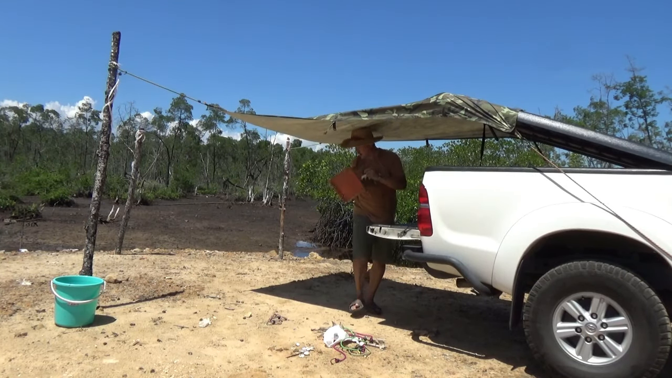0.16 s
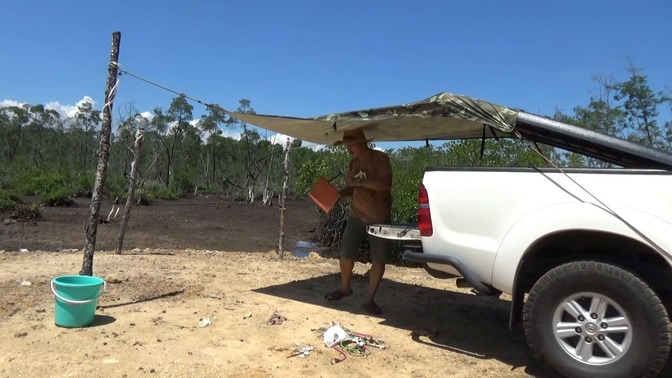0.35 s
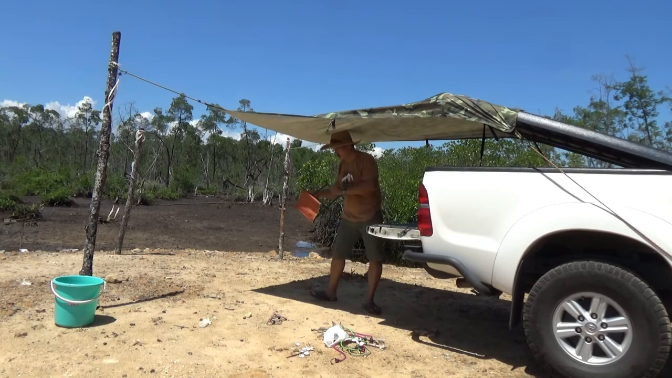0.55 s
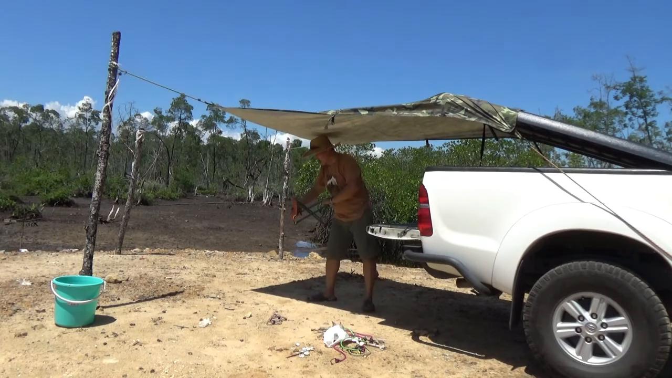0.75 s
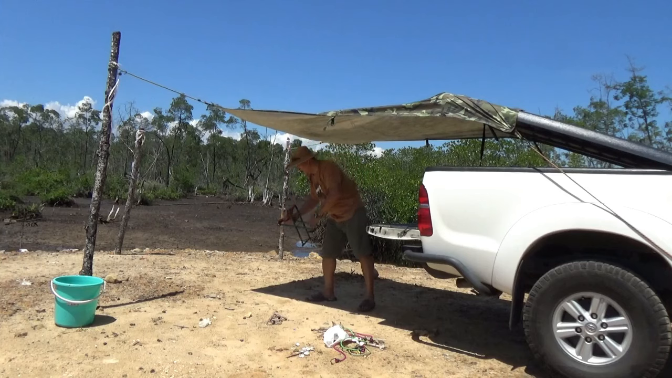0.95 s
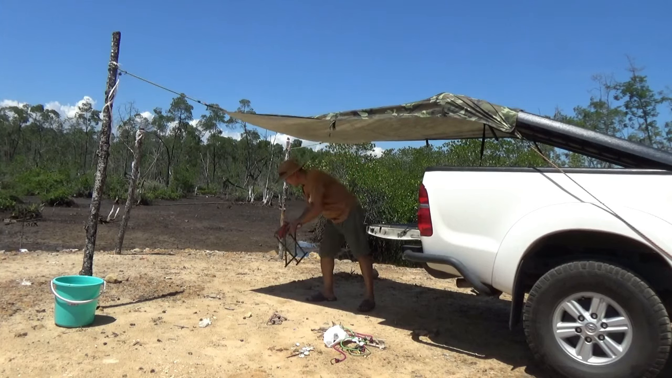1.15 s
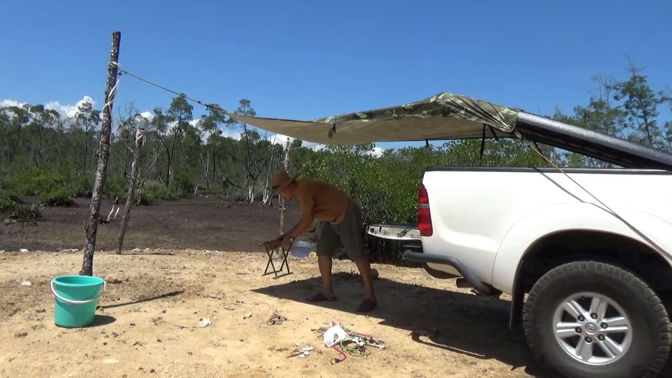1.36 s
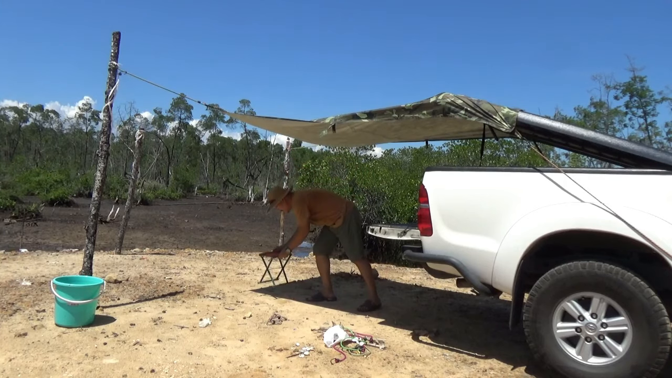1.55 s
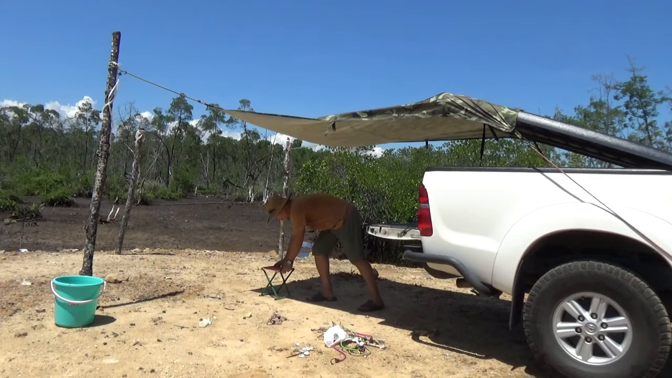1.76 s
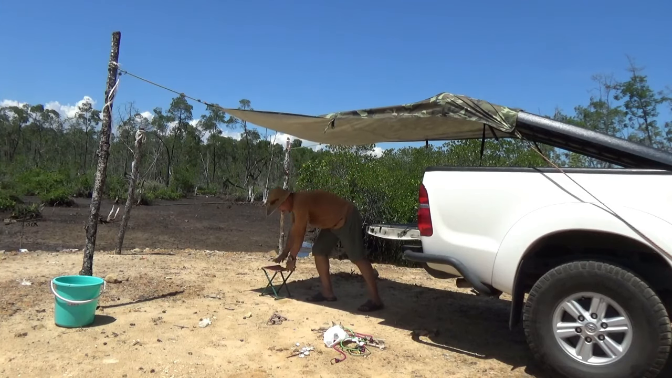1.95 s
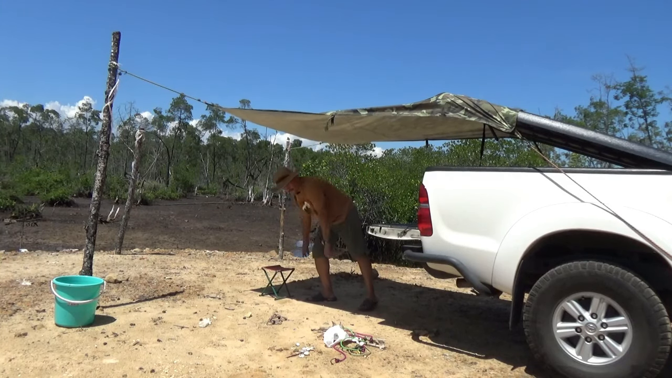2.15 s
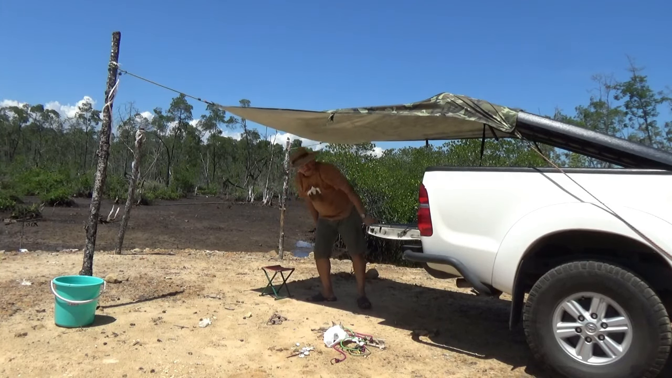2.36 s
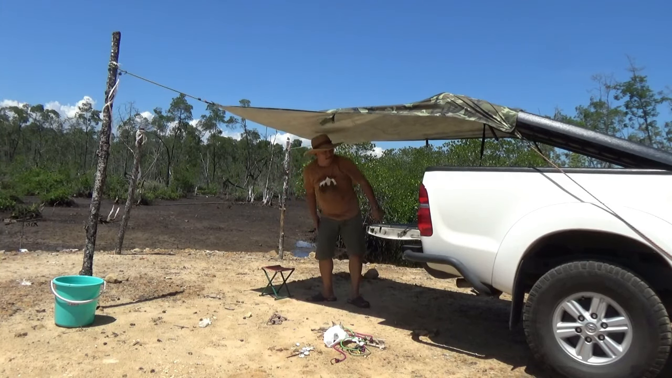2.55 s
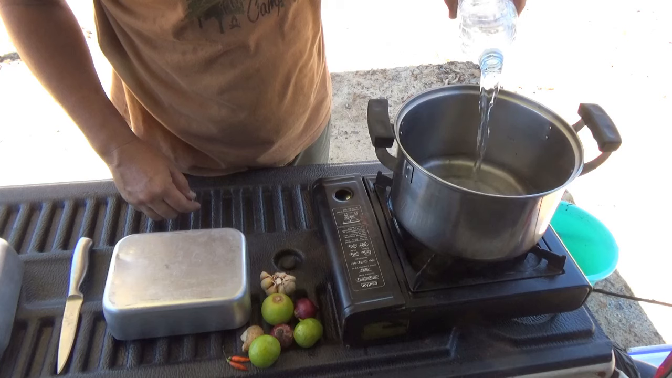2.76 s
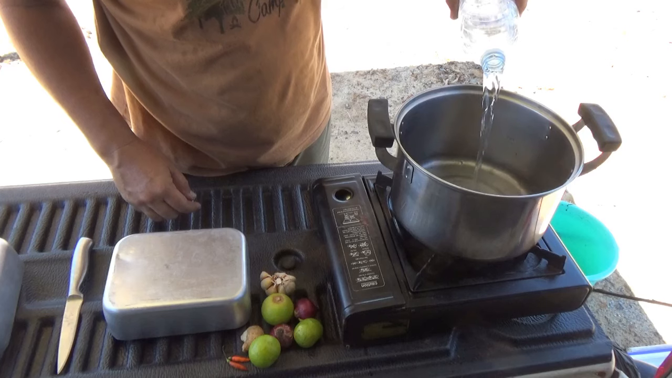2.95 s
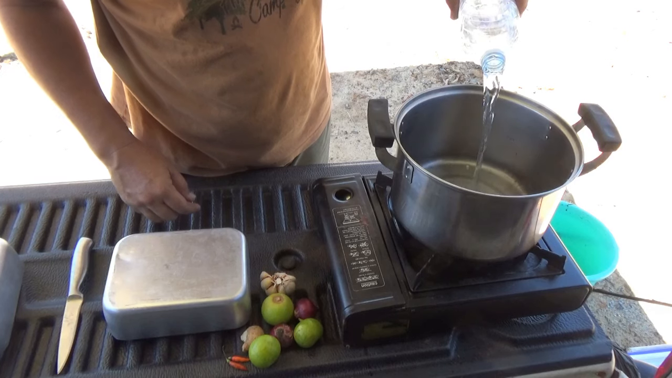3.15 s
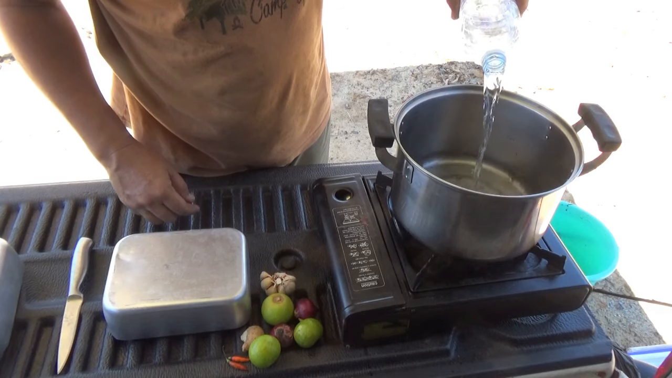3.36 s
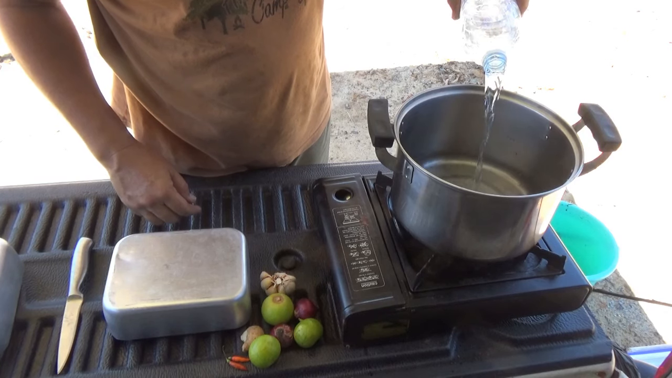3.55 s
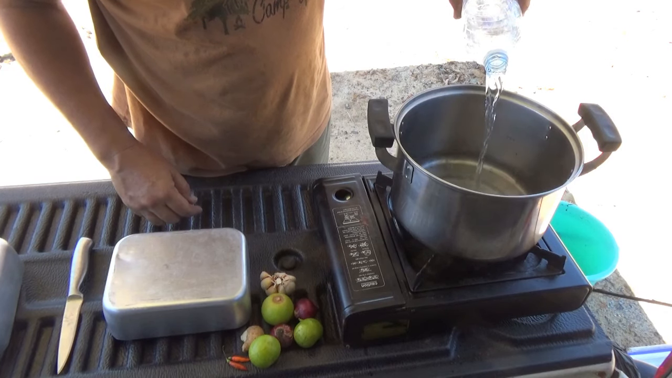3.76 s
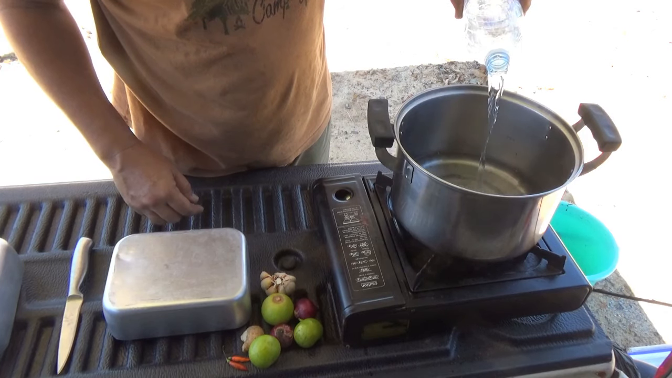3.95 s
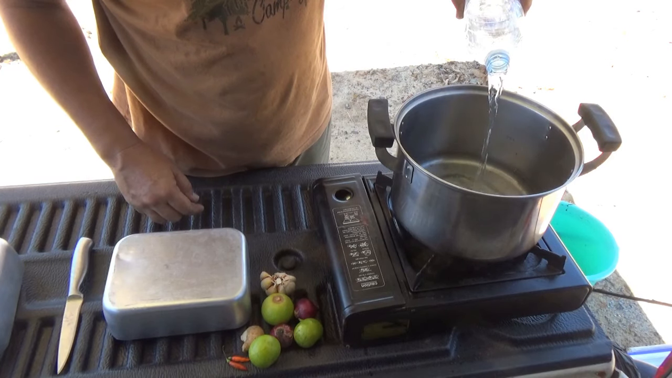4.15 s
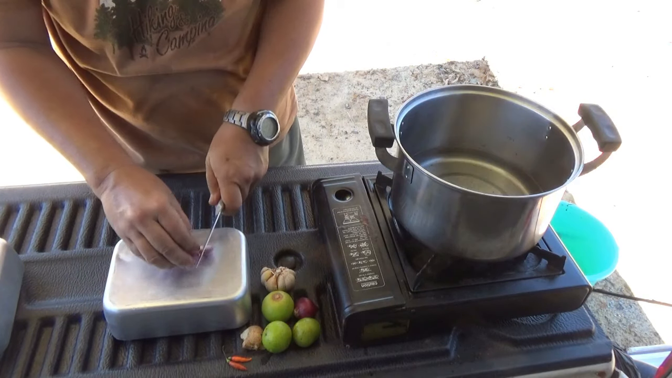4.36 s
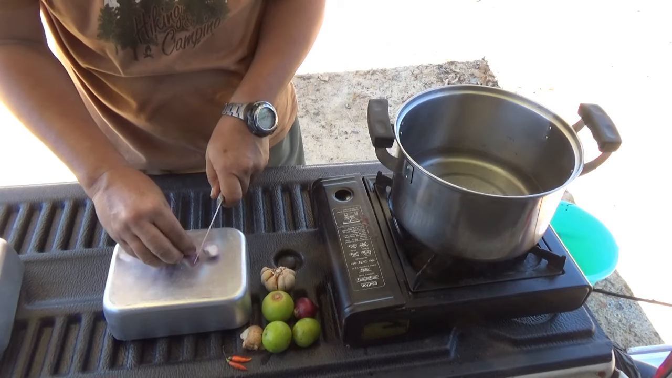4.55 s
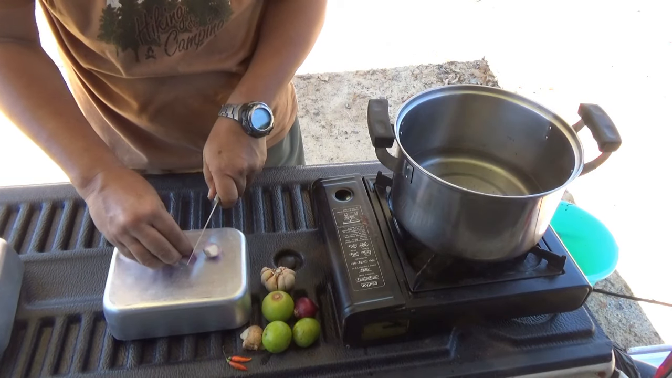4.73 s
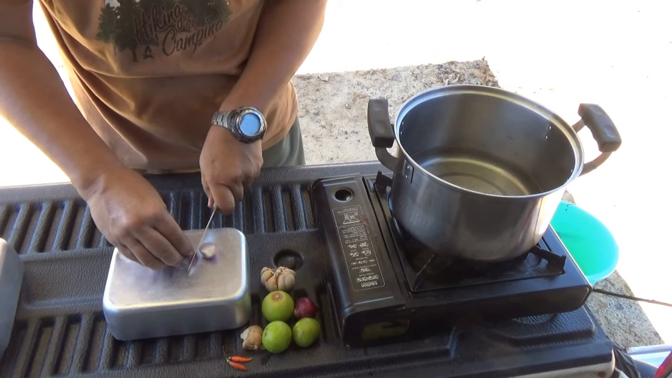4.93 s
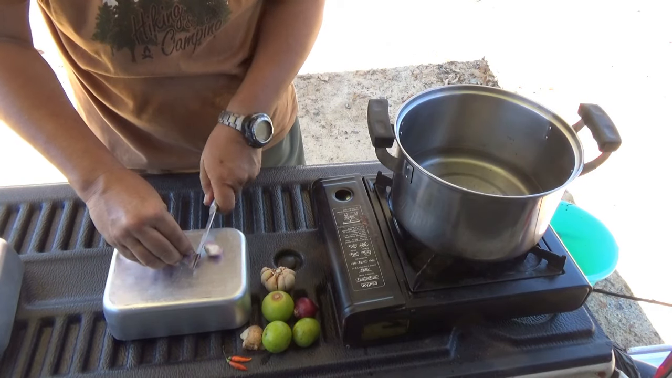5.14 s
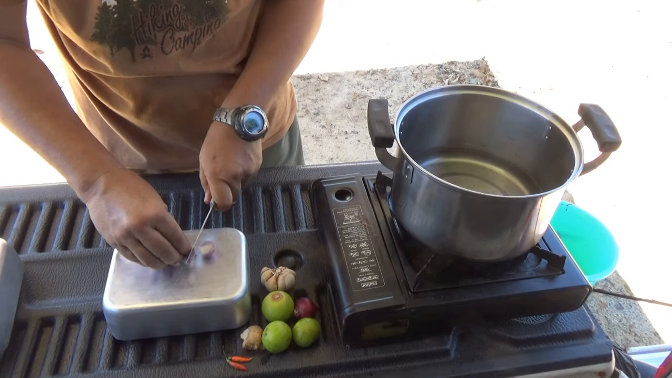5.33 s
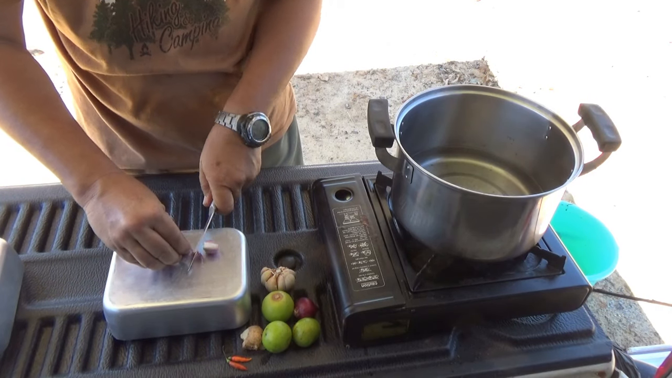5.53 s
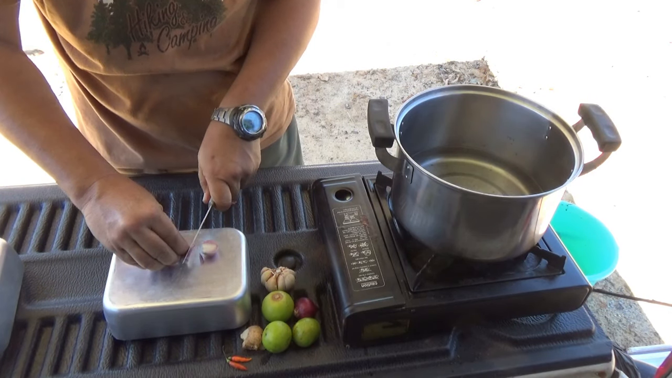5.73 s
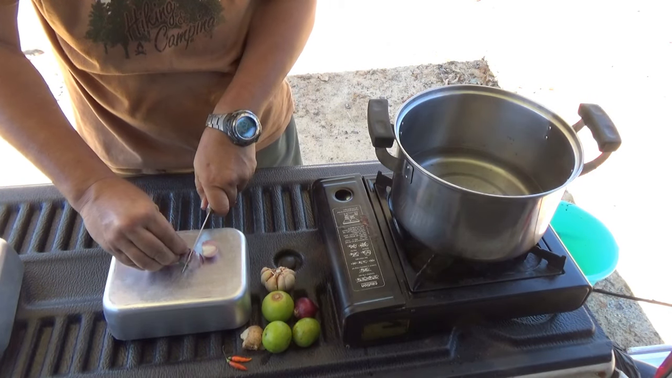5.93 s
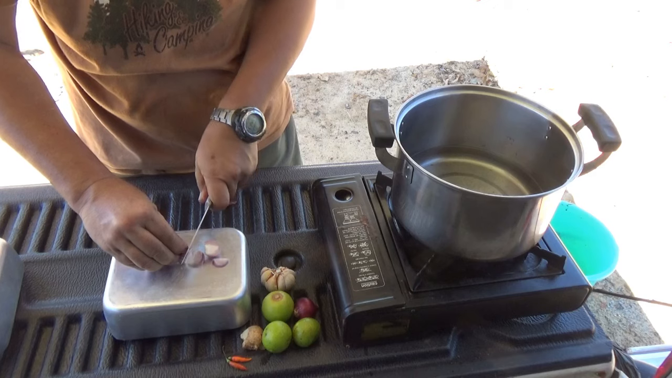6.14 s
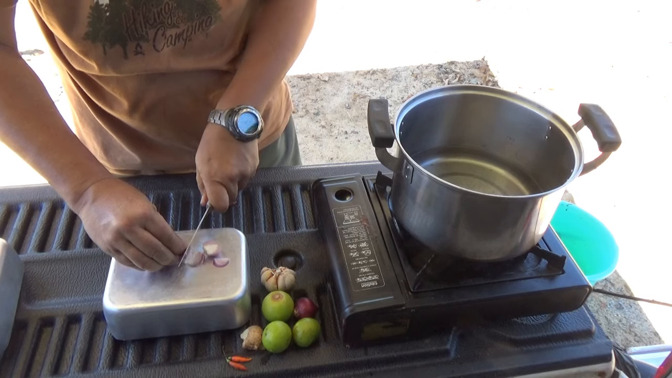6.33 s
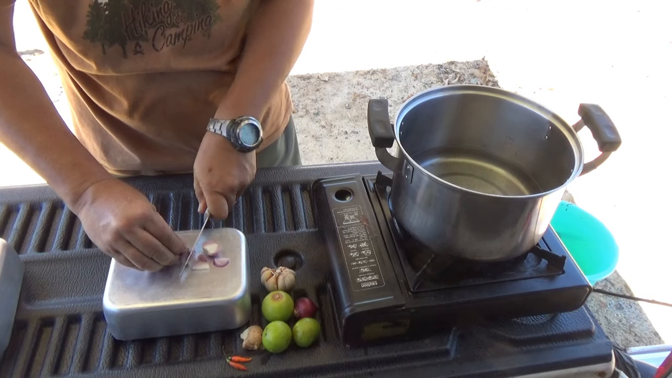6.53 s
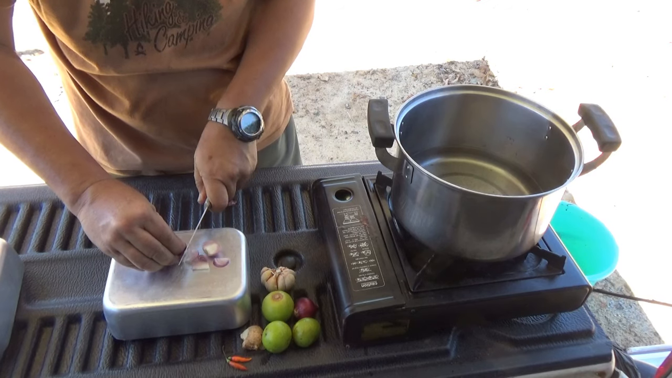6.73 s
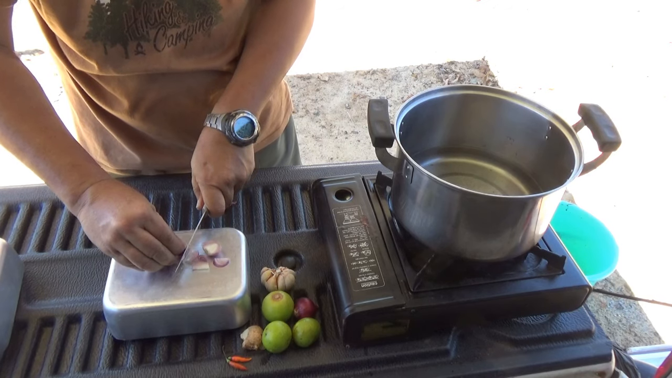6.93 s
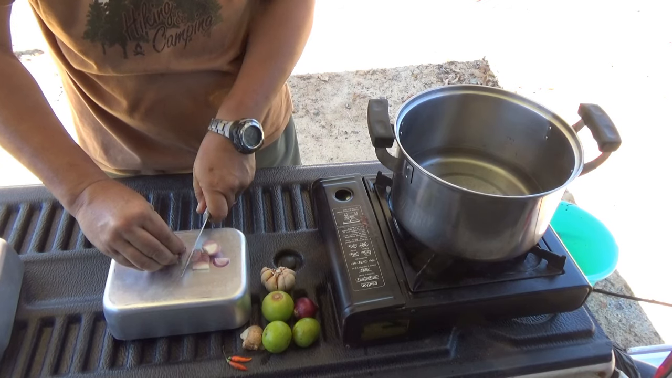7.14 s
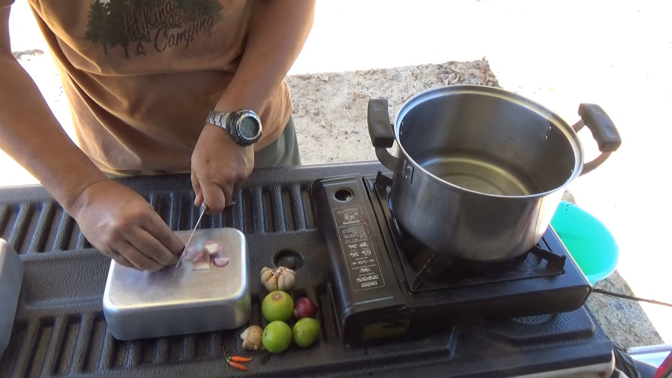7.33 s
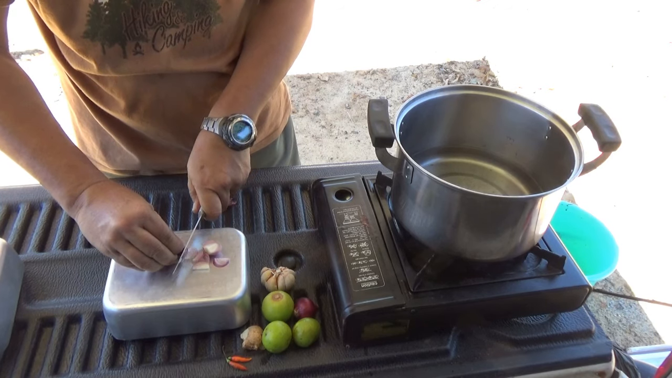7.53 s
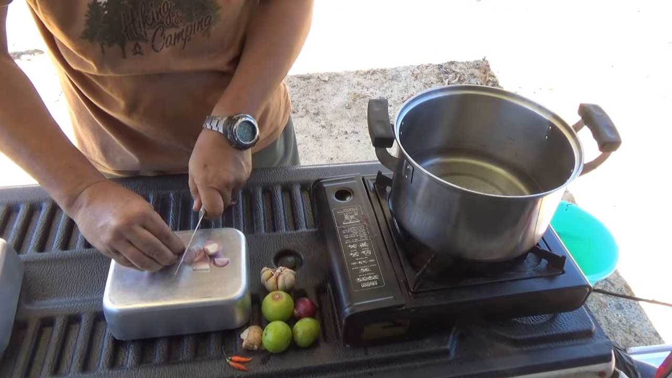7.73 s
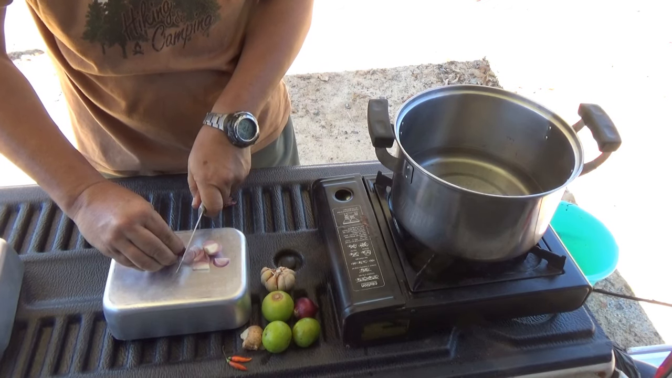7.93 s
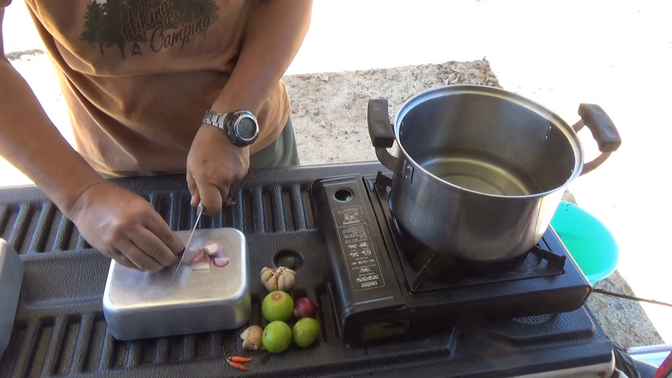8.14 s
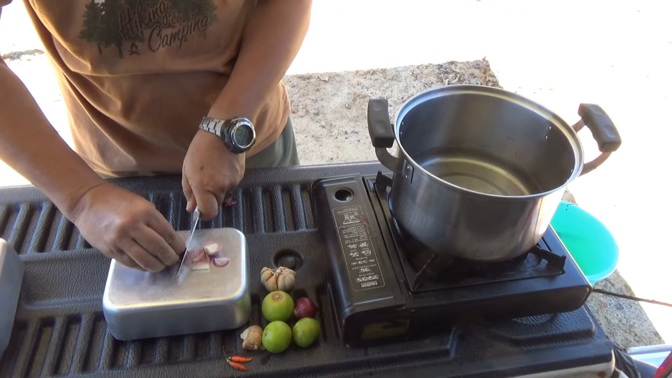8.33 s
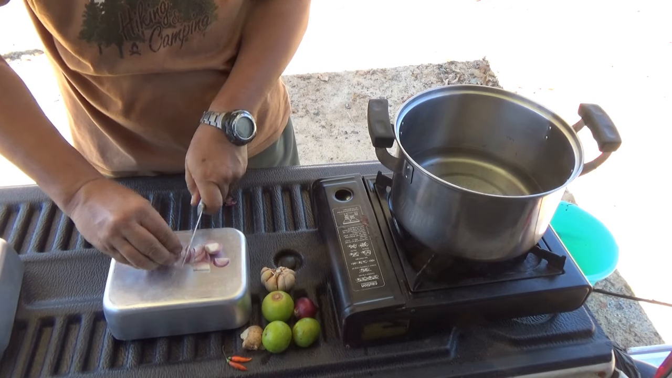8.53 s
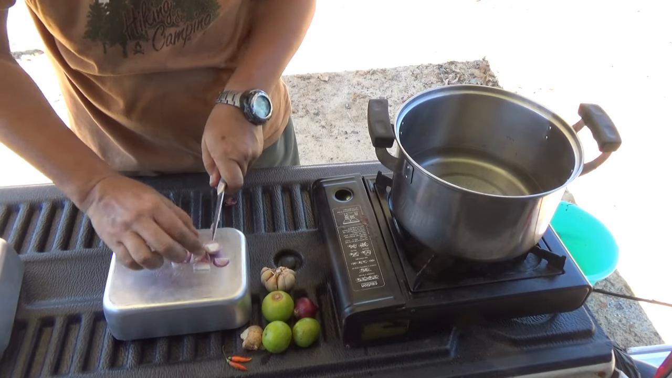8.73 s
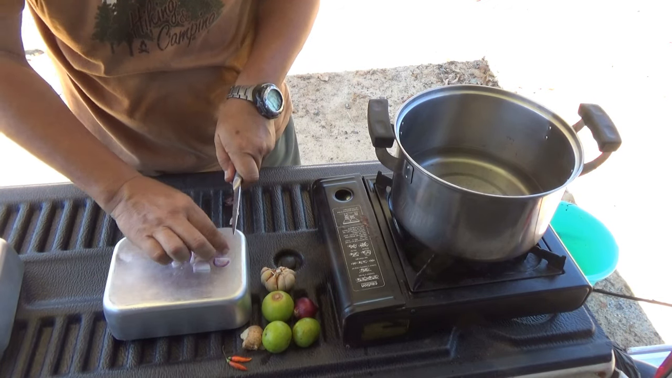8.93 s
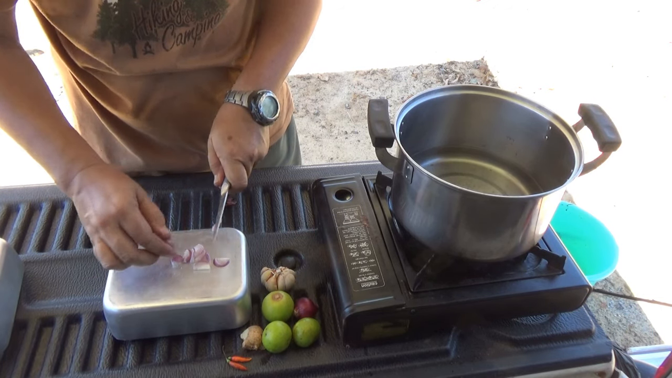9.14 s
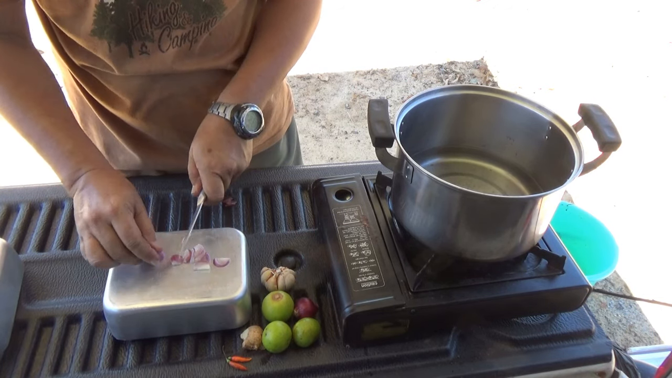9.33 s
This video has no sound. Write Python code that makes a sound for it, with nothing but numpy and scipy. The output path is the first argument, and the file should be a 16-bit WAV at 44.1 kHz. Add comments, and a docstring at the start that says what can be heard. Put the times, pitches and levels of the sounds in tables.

```python
"""In a dry bush camp, cicadas (noise swelling in step) throb over light wind, a stool's struck tubes snap and
feet crunch gravel. Then a bottle pours into a steel pot: surging fizz, bubbles rising in pitch, faintly ringing
walls. A knife saws and chops small bulbs on an upturned tin on a tailgate: rough forces drive the tin's
resonances, the panel booms and the freed blade rings in beating partials. Light tip contacts tick; late on, a
few faint bird notes glide as arched sine tones."""
import sys
import numpy as np
from scipy import signal
from scipy.io import wavfile
from scipy.ndimage import uniform_filter1d

SR = 44100
rng = np.random.default_rng(int(sys.argv[2]) if len(sys.argv) > 2 else 0)


def bounce(signal):
    """Save signal as a 16-bit WAV file at the path given by the first command-line argument."""
    frames = np.transpose(np.atleast_2d(signal))
    limited = np.clip(frames, -1, 1)
    pcm = np.round(limited * 32767).astype(np.int16)
    wavfile.write(sys.argv[1], SR, pcm)


N = 414099
T = np.arange(N) / SR


def gain_of(db):
    """Decibel law: amplitude gain is 10 to the power dB/20."""
    return 10 ** (np.asarray(db) / 20)


def evened(x):
    """Power normalization: scales the whole array to rms 1."""
    return x / np.sqrt(np.mean(x ** 2) + 1e-20)


def read(points, hz):
    """Spectral interpolation: reads a table along a logarithmic frequency axis."""
    f, value = np.transpose(points)
    return np.interp(np.log(hz + 1), np.log(f + 1), value)


def curve(rows, column=1, off=-120):
    """Envelope interpolation: one column of a time table, at the off level outside it."""
    rows = np.array(rows)
    return np.interp(T, rows[:, 0], rows[:, column], left=off, right=off)


def add(mix, s, sound):
    """Superposition: adds a sound in place, starting at s seconds."""
    part = mix[round(s * SR):][:len(sound)]
    part += sound[:len(part)]


# Coherence of far sound between the two ears: (frequency [Hz], left-right likeness [0-1])
FAR_LIKENESS = [(60, 0.99), (290, 0.85), (640, 0.22), (3100, .75), (6800, 0.59), (15000, 1)]


def noise(spectrum, patchy_db, same=FAR_LIKENESS, size=512):
    """Partial coherence: shaped stereo noise of rms 1 with drifting louder and softer patches."""
    frames, hz = 4 * N // size + 5, np.fft.rfftfreq(size, 1 / SR)
    a, b, c, d, patches = rng.standard_normal((frames, len(hz), 5)).T
    patches = uniform_filter1d(patches, size=9, axis=0)
    patches = evened(uniform_filter1d(patches, size=6, axis=1))
    like = np.clip(read(same, hz), -1, 1)[:, None]
    left, other = a + 1j * b, c + 1j * d
    z = np.array([left, like * left + np.sqrt(1 - like ** 2) * other])
    z *= gain_of(read(spectrum, hz)[:, None] + patchy_db * patches)
    return evened(signal.istft(z, nperseg=size, noverlap=3 * size // 4)[1][:, :N])


def ring(x, modes):
    """Modal resonance: two-pole filters; steady white noise of rms 1 comes out near rms 1."""
    out, power = np.zeros(len(x)), 0
    for k, (hz, width, db) in enumerate(modes):
        r = np.exp(-np.pi * width / SR)  # pole radius: a wider mode decays sooner
        poles = [1, -2 * r * np.cos(2 * np.pi * hz / SR), r * r]
        mode = np.sqrt(1 - r) * signal.lfilter([1, 0, -1], poles, x)
        out += (-1) ** k * gain_of(db) * mode
        power += gain_of(2 * db)
    return out / np.sqrt(power)


def strikes(s, db, t60, rise=0.00038, bend=1.025):
    """Impact decay: envelopes that rise fast and die away, each cut off at 0.25 s."""
    out, t = np.zeros(N), np.arange(SR // 4) / SR
    for when, level_db, fall in zip(s, db, t60):
        decay = gain_of(level_db - 60 * (t / max(fall, .005)) ** bend)
        add(out, when, decay * (1 - np.exp(-t / rise)))
    return out


def swells(s, length, db, taper=0.71):
    """Gradual onset: an envelope of soft-edged bursts."""
    out = np.zeros(N)
    for when, span, level_db in zip(s, length, db):
        add(out, when, gain_of(level_db) * signal.windows.tukey(round(span * SR), min(taper, 1)))
    return out


def beat(hz, t):
    """Beating: a close pair of partials makes the ring waver."""
    apart_hz, turn = rng.uniform([15, 0], [45, 1])
    return np.sin(2 * np.pi * hz * t) + 0.33 * np.sin(2 * np.pi * ((hz + apart_hz) * t + turn))


def gritty(spread_db, span):
    """Friction roughness: random gain of rms 1, smoothed over span samples."""
    return evened(gain_of(spread_db * evened(uniform_filter1d(rng.standard_normal(N), span))))


def nearby(x, wet_db, t60, pan_db):
    """Early reflection: direct sound plus sparse echoes off ground and vehicle, unlike in each ear."""
    at = np.arange(40, 6000, 24) + rng.integers(0, 24, (2, 249))
    echoes = rng.choice([-1., 1.], at.shape) * gain_of(-60 * at / SR / t60)
    taps = np.zeros((2, 6100))
    np.put_along_axis(taps, at, echoes, 1)
    taps *= gain_of(wet_db) / np.linalg.norm(taps[0])
    taps[:, 0] = 1  # direct sound
    return signal.oaconvolve(x[None], taps, axes=1)[:, :N] * gain_of([[pan_db / 2], [-pan_db / 2]])


# Spectrum of the cicada chorus: (frequency [Hz], relative density [dB per Hz])
CICADA_SPECTRUM = [(3800, -56), (4700, -11), (5300, -4.5), (5950, 3), (6600, -4.5), (7600, -12),
                   (11500, -17), (13500, -39)]
# Spectrum of far bush and leaves: (frequency [Hz], relative density [dB per Hz])
AIR_SPECTRUM = [(30, -27), (60, -3), (130, -3), (300, -7.5), (700, -12.5), (2000, -16), (4000, -19),
                (9000, -16.5), (16000, -36)]
# Spectrum of wind on the microphone: (frequency [Hz], relative density [dB per Hz])
GUST_SPECTRUM = [(25, -7), (70, 7), (150, -7), (240, -16.5), (480, -56)]
# Separate gusts, dying down: (time [s], level [dB])
GUST_LEVELS = [(0, -43.5), (.2, -33), (.26, -49.5), (.39, -42), (.66, -78), (.77, -56), (.93, -70),
               (1., -46), (1.07, -76), (1.13, -54.5), (1.5, -72), (1.6, -59), (2.3, -69)]
STEP_S = 2.664  # the chorus and air grow louder and the throb gaps deepen: the levels below step from first to second
CHORUS_DB, AIR_DB, GAP_DEPTH_DB = (-51, -44), (-55.5, -51.5), (2, 7.5)
# throb rate [1/s] at GAP_S [s], where a gap falls, and its steady slowing [1/s^2]
THROBS_PER_S, GAP_S, SLOWING_PER_S2 = 6.49, 7.397, .09


def bush():
    """Amplitude modulation throbs the cicadas over steady air; turbulence buffets the microphone."""
    levels = (CHORUS_DB, GAP_DEPTH_DB, AIR_DB)
    chorus_db, depth_db, air_db = (np.where(T < STEP_S, *pair) for pair in levels)
    since = T - GAP_S
    cycles = (THROBS_PER_S - SLOWING_PER_S2 * since / 2) * since
    gaps = abs(np.cos(np.pi * cycles)) ** 2.6  # long swells, short gaps
    cicadas = noise(CICADA_SPECTRUM, patchy_db=1.4) * gain_of(chorus_db - depth_db * gaps)
    air = noise(AIR_SPECTRUM, patchy_db=2.1, size=1024) * gain_of(air_db)
    gusts = noise(GUST_SPECTRUM, patchy_db=2.5, size=2048) * gain_of(curve(GUST_LEVELS))
    return cicadas + air + gusts


# Stool snaps: (time [s], level [dB])
SNAPS = [(0.172, -11.5), (0.223, -34), (1.105, -31), (1.25, -30.5), (1.7156, -17.5)]
# Modes of the frame tubes: (frequency [Hz], width [Hz], relative level [dB])
TUBE_MODES = [(674, 60, -11), (1980, 160, 12), (3960, 240, 7.5), (6660, 550, 16.5), (8080, 1400, 16.5),
              (10300, 960, 9.5)]
# Spectrum of crunching gravel: (frequency [Hz], relative density [dB per Hz])
GRAVEL_SPECTRUM = [(400, 1), (1500, 9), (4500, 8), (9900, 4.5), (16000, -15)]
# Feet and cloth: (start [s], length [s], level [dB])
SHUFFLES = [(0, 0.66, -51.5), (0.616, 0.27, -50), (0.796, 0.17, -47.5), (1.066, 0.12, -55),
            (1.598, 0.13, -51.5), (2.027, 0.093, -53.5), (2.492, 0.11, -53)]


def stool():
    """Impact excitation rings the frame tubes and a low thud; granular friction crunches gravel."""
    s, db = np.transpose(SNAPS)
    white = rng.standard_normal(N)
    burst = strikes(s, db, 0.041 + 0 * s, rise=0.0013) * white
    clatter = signal.lfilter([1, 2, 1], 4, burst)  # broadband, with softened treble
    snap = gain_of(-3.0) * ring(burst, TUBE_MODES) + gain_of(-4.0) * clatter
    thud = ring(strikes(s, db - 21.5, 0.12 + 0 * s) * white, [(130, 76, 4.9), (292, 310, 7)])
    grains = noise(GRAVEL_SPECTRUM, patchy_db=2.0, size=256) * gritty(spread_db=0.5, span=60)
    crunch = grains * swells(*np.transpose(SHUFFLES))
    return nearby(snap + thud, wet_db=-8.5, t60=0.1, pan_db=0.5) + crunch


# Flow of the stream, which thins twice as the bottle gulps air: (time [s], splash level [dB])
STREAM_FLOW = [(2.664, -42.5), (3.25, -39.5), (3.38, -45), (3.5, -41), (3.78, -37), (3.81, -48.5),
               (3.87, -47.5), (3.9, -40), (4.245, -39)]
# Spectrum of the splash: (frequency [Hz], relative density [dB per Hz])
SPLASH_SPECTRUM = [(600, -16.5), (1700, -4.5), (3200, -12), (5000, -1.5), (8000, -1.5), (10100, -9.5),
                   (16000, -34)]
# Modes of the steel pot: (frequency [Hz], width [Hz], relative level [dB])
POT_MODES = [(636, 12, -1.5), (1144, 14, -5), (1714, 36, -9), (1960, 23, -11), (2940, 29, -3),
             (3635, 72, 3.5), (4800, 110, -6)]
# Loud bubbles: (time [s], level [dB], starting pitch [Hz])
BUBBLES = [(2.6656, -19, 6500), (2.761, -39, 8200), (2.794, -34.5, 3520), (2.89, -25.5, 9200),
           (2.9671, -30.5, 7800), (3.14, -22.5, 5100), (3.196, -25.5, 6800), (3.236, -28, 7800),
           (3.4005, -25, 4530), (3.416, -32, 3700), (3.481, -27, 8500), (3.616, -24.5, 7000),
           (3.7065, -47, 7140), (3.7628, -29, 6830), (3.9624, -34, 4400), (4.1478, -30, 5000),
           (4.157, -27, 10100), (4.2033, -38, 3630), (4.2353, -27, 5750)]
# the slug of water that traps a loud bubble also swells the splash, by a level relative to the bubble
SURGE_DB, SURGE_T60_S = -17, 0.14


def water():
    """Bubble resonance: a surging stream fizzes, traps bubbles that rise in pitch and drums the steel."""
    s, db, _ = np.transpose(BUBBLES)
    surges = strikes(s, db + SURGE_DB, SURGE_T60_S + 0 * s) * (T < STREAM_FLOW[-1][0])
    level = gain_of(curve(STREAM_FLOW)) + surges
    fizz = noise(SPLASH_SPECTRUM, patchy_db=4.0, same=[(1, 1), (9, 0.91)], size=256)[0]
    fizz = fizz * gritty(spread_db=2.0, span=25)
    steel = ring(noise([(1, 0), (9, 0)], patchy_db=6.0, size=2048)[0], POT_MODES)
    small, t = np.zeros(N), np.arange(SR // 20) / SR
    for hz in np.geomspace(1600, 10500, num=20):  # 25 small bubbles a second at each pitch
        sizes = gain_of(3.9 * np.minimum(rng.exponential(1, N), 4))
        drops = (rng.random(N) < 25. / SR) * sizes
        chirp = np.exp(-t * hz / 15) * np.sin(2 * np.pi * hz * t * (1 + 5.6 * t))
        small += signal.oaconvolve(drops, chirp)[:N]
    # the steel rings faintly under the fizz and small bubbles
    out = level * (gain_of(-2.5) * fizz + gain_of(-12) * steel + gain_of(-9) * evened(small))
    for s, db, hz in BUBBLES:  # a clear bubble inside a spray of smaller ones near its pitch
        tone = gain_of(-60 * t * hz / 170) * np.sin(2 * np.pi * hz * t * (1 + 0.56 * t))
        spray = ring(rng.standard_normal(len(t)), [(hz, 900., 0)])
        spray = gain_of(-12.0 - 60 * t / 0.094) * spray
        add(out, s, gain_of(db) * (1 - np.exp(-t / 0.0021)) * (tone + spray))
    return nearby(out, wet_db=-7.5, t60=0.085, pan_db=-1.0)


# Strokes drag harder and harder, cut through onto the tin, spring free and ring: (start [s], cut [s],
# scrape level at the cut [dB], then ring level of each of four blade modes [dB], as the grip damps it)
STROKES = [(4.952, 4.96, -23, -38, -31, -26.5, -29), (5.43, 5.43, -15, -28, -35, -26, -23.5),
           (5.877, 5.921, -19, -30, -38, -35, -26), (6.289, 6.462, -18.5, -51, -29.5, -37, -44),
           (6.839, 7.03, -16, -47, -38, -36, -25), (7.497, 7.607, -17.5, -23.5, -38, -40, -22.5),
           (8.378, 8.386, -17, -35, -29, -37, -45)]
FREE_S = 0.023  # from the cut to the peak of the drag, where the blade springs free
DRAG_DB, DRAG_RISE_DB_PER_S, DRAG_FALL_DB_PER_S = -20, 102, 646
SLIPS_PER_S, SLIP_DB, SLIP_S = 100, -11, 0.0031  # mean rate, size and decay time constant


def drags():
    """Stick-slip friction: the envelope of a growing drag, jolted by random slips of the edge."""
    drag, t = np.zeros(N), np.arange(SR // 2) / SR
    for start, cut, *_ in STROKES:
        late = t + start - (cut + FREE_S)
        slope_db = np.minimum(DRAG_RISE_DB_PER_S * late, -DRAG_FALL_DB_PER_S * late)
        add(drag, start, gain_of(DRAG_DB + slope_db))
    jolts = rng.random(N) < SLIPS_PER_S / SR
    slips = signal.lfilter([1], [1, -np.exp(-1 / (SLIP_S * SR))], jolts)
    return drag * evened(1 + gain_of(SLIP_DB) * slips)


# Modes of the blade: (frequency [Hz], t60 [s])
BLADE_MODES = [(2040, 0.13), (2896, 0.22), (3758, 0.3), (4818, 0.12)]


def blade():
    """Free vibration: after each stroke the released blade rings in decaying, beating modes."""
    out, t = np.zeros(N), np.arange(SR // 2) / SR
    for _, cut, _, *ring_db in STROKES:
        for (hz, fall), db in zip(BLADE_MODES, ring_db):
            decay = gain_of(db - 60 * t / fall) * (1 - np.exp(-t / 0.004))
            add(out, cut + FREE_S + 0.0061, decay * beat(hz, t))
    return out


# Booms of the tailgate under the tin: (frequency [Hz], width [Hz], relative level [dB])
TAILGATE_MODES = [(76.2, 4.4, -11), (139, 23, -1.5), (280.6, 62, -2), (379.4, 14.5, -4.5), (542, 224, 0)]


def tailgate(blows, rub, rumble):
    """Energy storage: the heavy panel swells late under the blows and booms on."""
    linger = np.exp(-1 / (0.054 * SR))
    shake = signal.lfilter([1 - linger], [1, -linger], gain_of(-19.0) * blows + gain_of(-10.0) * rub)
    return ring(rng.standard_normal(N) * (shake + rumble), TAILGATE_MODES)


def edge_catch(blow_starts):
    """Contact damping: the edge catches and chokes the tin just before each blow other than the cuts."""
    caught = np.zeros(N)
    caught[blow_starts] = 1
    caught[[round(cut * SR) for _, cut, *_ in STROKES]] = 0
    catch = signal.oaconvolve(caught, np.hanning(round(.009 * SR)))[round(.008 * SR):][:N]
    return 1 - 0.45 * np.clip(catch, 0, 1)


LEAP_S = .0026


def edge_leap():
    """Loss of contact: the edge leaps through the food in near silence just before each cut."""
    leap = np.ones(N)
    for _, cut, *_ in STROKES:
        add(leap, cut - LEAP_S, -.9 * signal.windows.tukey(round(LEAP_S * SR), .4))
    return leap


# Knife contacts: (time [s], drum level [dB], rasp level relative to the drum [dB])
CHOPS = [(4.422, -10.5, -24), (4.711, -41, -5), (4.75, -27.5, -25), (4.892, -18, 5), (4.917, -15.5, -0.5),
         (4.9505, -26, 11.5), (5.217, -26.5, -18), (5.298, -26.5, -16), (5.335, -29.5, -9),
         (5.352, -22.5, 2.5), (5.364, -11.5, -7), (5.393, -14.5, 1), (5.421, -16, -2), (5.533, -29.5, -8),
         (5.649, -27.5, -18), (5.733, -28, -19), (5.771, -12, -9.5), (5.787, -20.5, -2), (5.804, -17, -10),
         (5.852, -18.5, -1.5), (5.874, -14, -5), (5.908, -16, -0.5), (6.167, -29.5, -14),
         (6.239, -29.5, -27), (6.294, -20, -8.5), (6.325, -22, -24), (6.339, -19, -19), (6.354, -16, -19),
         (6.383, -24.5, -5), (6.396, -20, -5.5), (6.455, -12.5, -7.5), (6.606, -38, -13),
         (6.721, -27.5, -9.5), (6.856, -12.5, -8), (6.879, -19.5, -19), (6.897, -17.5, -13),
         (6.926, -19, -12), (6.96, -28, -0.5), (6.983, -13, -13), (7.006, -13.5, -7.5), (7.021, -19, -10),
         (7.158, -34.5, -4.5), (7.41, -18.5, -12), (7.455, -21, -4), (7.506, -18.5, -37), (7.533, -27, -7),
         (7.56, -15, -6.5), (7.59, -12, -9), (8.02, -31, -5.5), (8.243, -16.5, -5), (8.274, -29, 3),
         (8.325, -13.5, -2.5), (8.342, -10.5, -31), (8.375, -10.5, -5), (8.498, -24, -8.5),
         (9.286, -31.5, -17)]
# Shifting on the tin, and low rumbles under the first knock and first stroke:
# (start [s], length [s], level [dB], low rumble relative to it [dB])
NUDGES = [(4.232, 0.1, -43.5, 5), (4.42, 0.033, -54, 20), (4.54, 0.55, -50, -10), (4.888, 0.0625, -51, 19),
          (6.679, 0.071, -51.5, -64), (7.296, 0.14, -46.5, -69), (8.101, 0.21, -43.5, -15.5),
          (8.555, 0.057, -56, 7), (9.281, 0.25, -44.5, -6.5)]
# Tin: the air box drums below 1 kHz, the walls clang up to 2.4 kHz:
# (frequency [Hz], width [Hz], relative level [dB])
TIN_MODES = [(574, 145, 9), (636, 72.4, 10.5), (779.6, 35, -4), (1264, 16.5, 2), (1420, 13, -2),
             (1489, 52, 10), (1622, 30, 5.5), (1874, 42, 2), (2573, 240, -7), (3051, 26, -7.5),
             (4160, 76, -8.5), (4600, 43, -12.5), (5080, 53, -14), (7600, 120, -13), (8630, 290, 0),
             (8900, 2600, -1)]
# Spectrum of the dry rasp of the edge: (frequency [Hz], relative density [dB per Hz])
RASP_SPECTRUM = [(120, -43), (500, -1), (1000, 0), (2400, -12), (4200, -4.5), (8800, -5), (16000, -27)]
CUT_RASP_DB = 11  # rasp over drum in the cut


def knife():
    """Forced vibration: rough blows and drags drive the tin and tailgate, under the rasp of the edge."""
    cuts = [(cut, db - CUT_RASP_DB, CUT_RASP_DB) for _, cut, db, *_ in STROKES]
    s, drum_db, rasp_db = np.transpose(CHOPS + cuts)
    t60 = 0.098 + 0.00028 * (drum_db + rasp_db + 24)  # harder rasps last longer
    drag = drags()
    when, length, nudge_db, rumble_db = np.transpose(NUDGES)
    nudge = swells(when, length, nudge_db, taper=0.031)
    rumble = swells(when, length, nudge_db + rumble_db, taper=0.038)
    force = rng.standard_normal(N) * gritty(spread_db=5.5, span=40)
    starts = np.round(s * SR).astype(int)
    kicks = np.zeros(N)  # each blow starts with one clean push
    kicks[starts] = gain_of(drum_db + 22.0)

    blows = strikes(s, drum_db - 3.0, 1.05 * t60)
    push = blows + gain_of(-6.0) * drag + nudge
    drum = ring(kicks + force * push, [m for m in TIN_MODES if m[0] < 1000])

    sharp = strikes(s, drum_db + 0.78 * rasp_db - 0.5, 0.5 * t60)
    sharp = sharp + gain_of(-7.0) * drag + gain_of(-5.5) * nudge
    wall_modes = [m for m in TIN_MODES if 1000 < m[0] < 2400]
    clang = ring(gain_of(-22.0) * kicks + force * sharp, wall_modes)

    rub = strikes(s, drum_db + rasp_db - 7.0, 0.9 * t60, rise=0.00067, bend=1.35)
    rub = rub + gain_of(-5.5) * drag + gain_of(-8.0) * nudge
    hiss = noise(RASP_SPECTRUM, patchy_db=4.0, same=[(1, 1), (9, 1)], size=256)[0]
    hiss = hiss * gritty(spread_db=-0.5, span=30)
    # the contact point moves, favouring other modes
    wander = noise([(1, 0), (9, 0)], patchy_db=4.5, size=1024)[0]
    high_modes = [m for m in TIN_MODES if m[0] > 2400]
    shimmer = ring(gain_of(-54.0) * kicks + wander * rub, high_modes)

    boom = tailgate(blows, rub, rumble)
    tin = drum + clang + gain_of(1.0) * shimmer + gain_of(-1.5) * hiss * rub
    choke = edge_catch(starts)
    # the side walls reach the two ears out of step
    walls = gain_of(-14.5) * np.roll(clang * choke, 7) * [[1], [-1]]
    body = nearby(tin * choke + boom, wet_db=-9.5, t60=0.091, pan_db=-0.5)
    return (body + walls) * edge_leap() + blade()


# Light touches of the knife tip: (time [s], level [dB], pitch [Hz])
TICKS = [(4.563, -32, 3340), (4.627, -31, 2950), (5.539, -38, 1950), (6.722, -29, 2720), (7.158, -29, 2180),
         (7.735, -36, 2640)]


def ticks():
    """Heavily damped resonance: short dry clicks with a faint pitch."""
    out, t = np.zeros(N), np.arange(SR // 20) / SR
    for s, db, hz in TICKS:
        burst = gain_of(db - 60 * t / 0.046) * rng.standard_normal(len(t))
        add(out, s, ring(burst, [(hz, 500., 0), (0.94 * hz, 1800., 0)]))
    return nearby(out, wet_db=-5.5, t60=0.11, pan_db=-1.0)


# Faint bird notes: (time [s], length [s], base pitch [Hz], rise [Hz], level [dB])
BIRD_NOTES = [(8.786, 0.035, 3830, 33, -54), (8.816, 0.04, 3360, 15, -55), (8.938, 0.057, 1610, 340, -59),
              (9.075, 0.045, 1650, 260, -57), (9.178, 0.071, 1470, 480, -57)]


def birds():
    """Frequency modulation: soft sines slide up and down again in an arch."""
    out = np.zeros(N)
    for s, length, base_hz, rise_hz, db in BIRD_NOTES:
        hz = base_hz + rise_hz * np.sin(np.linspace(0, np.pi, round(length * SR)))
        note = np.sin(2 * np.pi * np.cumsum(hz) / SR)
        add(out, s, gain_of(db) * signal.windows.tukey(len(hz), .5) * note)
    return nearby(out, wet_db=-15.0, t60=.12, pan_db=-1.0)


def scene():
    """Superposition: all sources together."""
    return bush() + stool() + water() + knife() + ticks() + birds()


EDGE_HZ = 15900  # upper band limit


def record(dry):
    """Mid-side filtering narrows bass and top treble; soft saturation, then the band limit."""
    mid, side = (dry[0] + dry[1]) / 2, (dry[0] - dry[1]) / 2
    side = signal.sosfilt(signal.butter(1, 70, "high", fs=SR, output="sos"), side)
    side = signal.sosfilt(signal.butter(3, 9500, fs=SR, output="sos"), side)
    pair = .75 * np.tanh(np.array([mid + side, mid - side]) / .75)
    lowpass = signal.firwin(511, EDGE_HZ, window=("kaiser", 9), fs=SR)
    return signal.oaconvolve(pair, lowpass[None], "same")


dry = scene()
out = record(dry)
bounce(out)
```